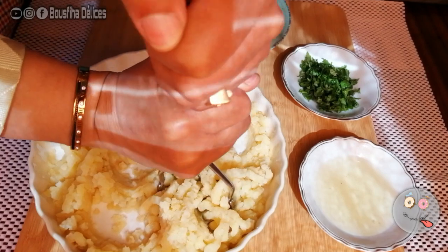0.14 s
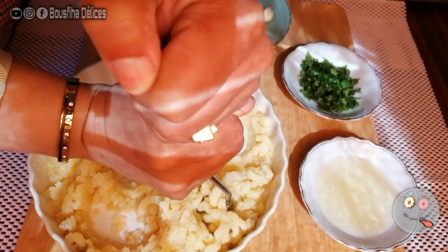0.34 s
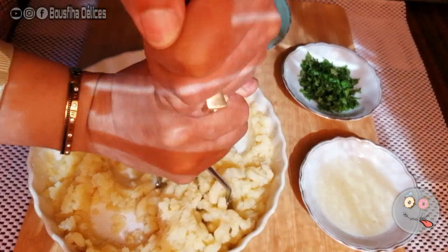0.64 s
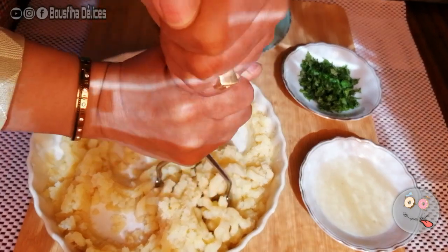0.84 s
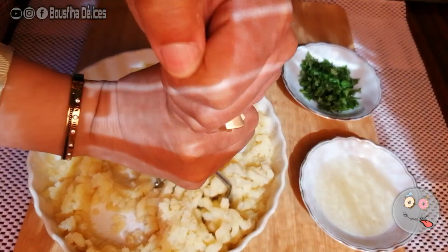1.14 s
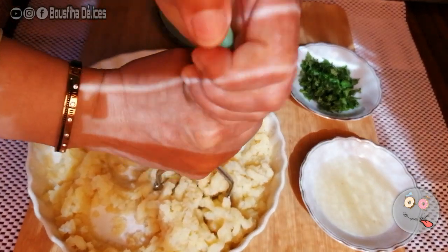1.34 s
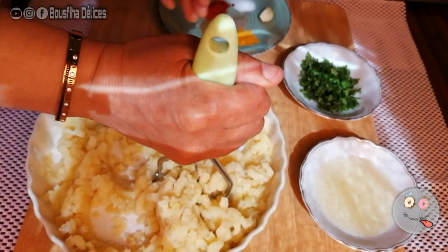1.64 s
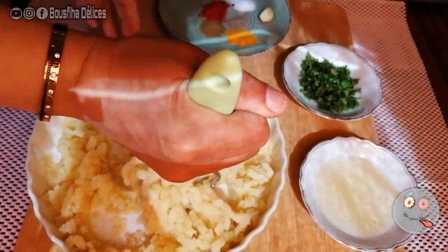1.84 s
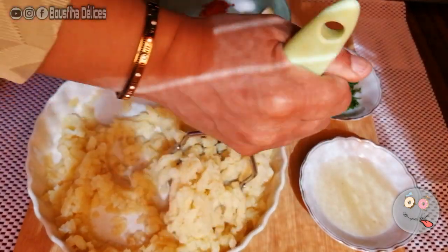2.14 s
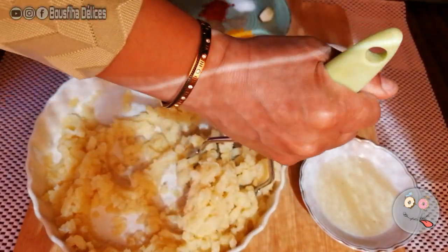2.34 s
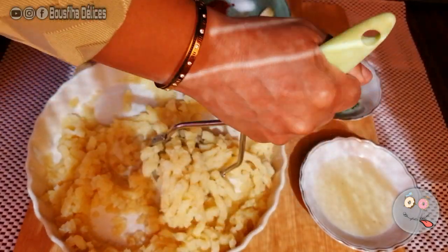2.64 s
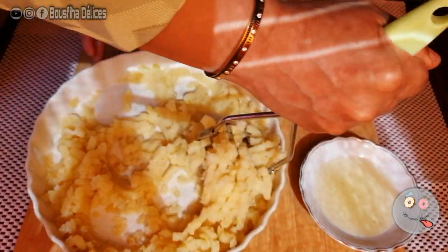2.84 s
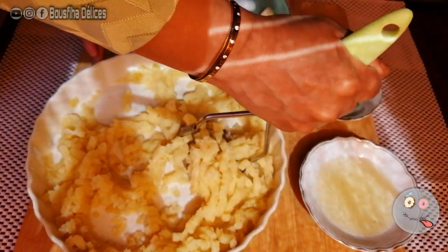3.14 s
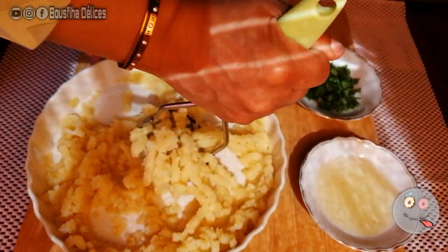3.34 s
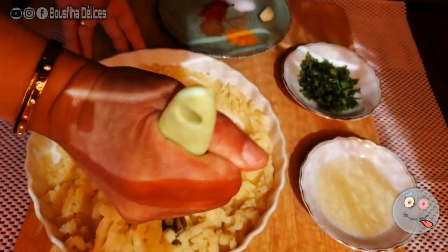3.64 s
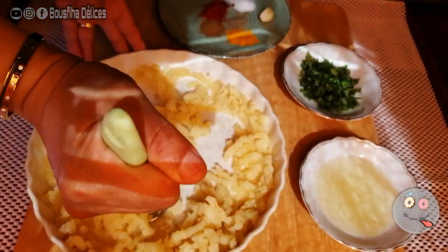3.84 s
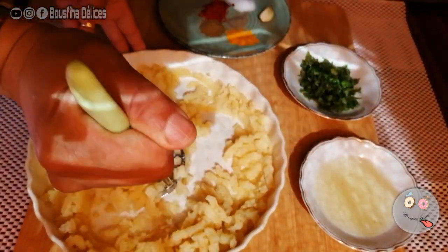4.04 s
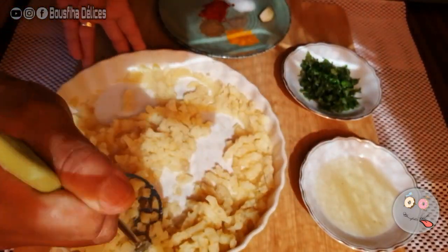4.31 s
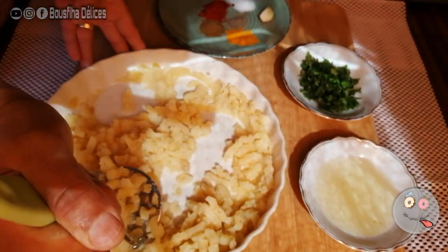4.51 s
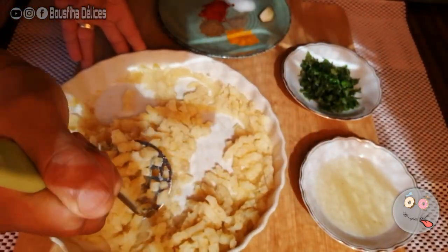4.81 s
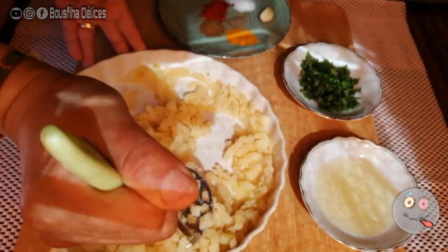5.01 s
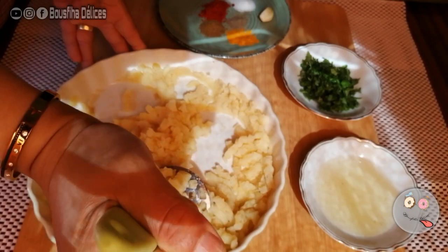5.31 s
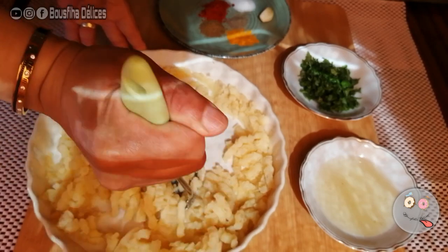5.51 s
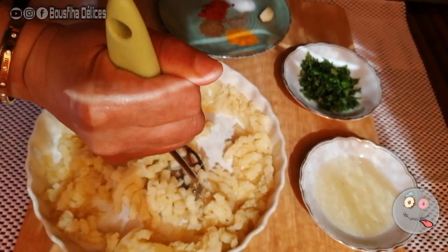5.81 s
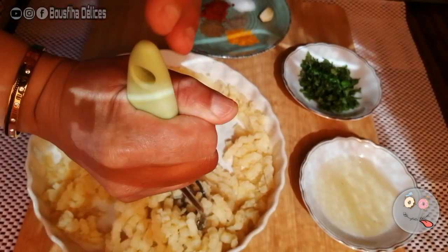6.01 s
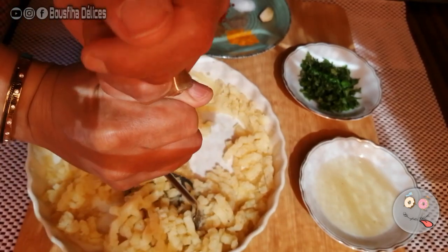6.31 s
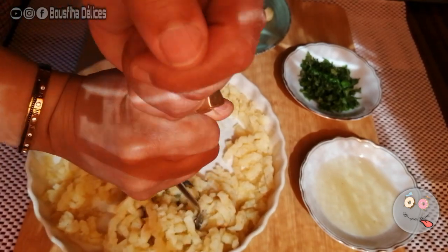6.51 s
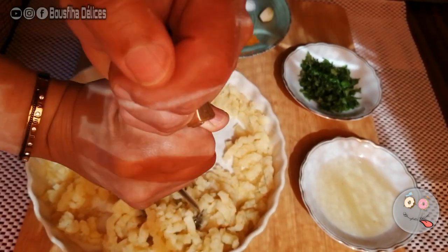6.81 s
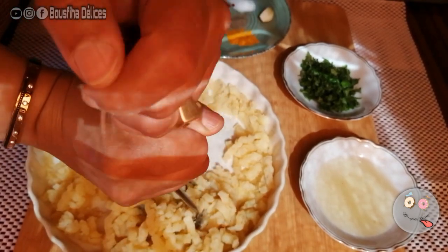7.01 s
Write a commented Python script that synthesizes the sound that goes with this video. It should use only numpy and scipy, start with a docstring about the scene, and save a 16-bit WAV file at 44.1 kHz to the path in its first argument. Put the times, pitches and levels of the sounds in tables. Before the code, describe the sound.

A close stereo microphone hears potatoes mashed in a ceramic bowl on a wooden table in a small kitchen, over very faint low rumble, wavering appliance hum and soft hiss. A full dull thud lands at 0.1 s. Fine wet crackle swells and fades as lumps give way, with small spits around 0.5 s. A light wire tap comes at 1.7 s, then a brighter, louder one at 2.3 s leading straight into a short gritty scrape that fades by about 2.6 s. Cushioned knocks follow at 2.8, 3.5, 4.3 and 5.2 s, those at 3.5 and 5.2 s a little harder. Wet pops come near 3.9 and 4.7 s, the latter with a tiny thin rim ring. A muted tap sounds at 5.7 s. Squelching thickens around 6.2 s with a very muffled thud, and a last soft knock falls at 7.0 s.

```python
"""In a small kitchen, a wire masher is pushed through boiled potatoes in a ceramic bowl on a wooden table.
Each knock is a low-passed impulse, cushioned by the mash, that excites decaying modes and a noise tail.
Between knocks the mash squelches as random grains, with noise bursts where air pockets burst.
The wire taps and grazes the bowl as struck modes, and scrapes it as grains under a stroke envelope.
Coloured noise and sines give a faint rumble, hum and hiss."""
import sys
import numpy as np
from scipy import signal
from scipy.fft import rfft, irfft, next_fast_len
from scipy.io import wavfile

SR = 44100
rng = np.random.default_rng(int(sys.argv[2]) if len(sys.argv) > 2 else 0)


def wav_out(sig):
    """Save sig, one row per channel (or a flat mono array), as 16-bit PCM at SR to the path in sys.argv[1]."""
    wavfile.write(sys.argv[1], SR, np.round(np.clip(np.atleast_2d(sig).T, -1, 1) * 32767).astype(np.int16))


N = 315756
TIME = np.arange(N) / SR
RING_TIME = TIME[:SR * 2 // 3]   # time axis of every impulse response, s


def from_db(db):
    """Logarithmic level: decibels to amplitude gain."""
    return 10 ** (np.asarray(db) / 20)


def rms_one(x):
    """Normalisation: scale to an rms of 1."""
    return x / np.sqrt(np.mean(x ** 2) + 1e-20)


def at_hz(points, hz):
    """Interpolation of a spectrum on a logarithmic frequency axis."""
    known_hz, values = np.transpose(points)
    return np.interp(np.log(np.maximum(hz, 1)), np.log(known_hz), values)


def butter(x, hz, kind, order=2):
    """Causal Butterworth filtering: a maximally flat passband."""
    sections = signal.butter(order, np.clip(hz, 10, 0.45 * SR), kind, fs=SR, output="sos")
    return signal.sosfilt(sections, x + 1e-18)


def colour(x, spectrum):
    """Spectral shaping: weight a noise by frequency, then normalise to rms 1."""
    size = next_fast_len(x.shape[-1])
    gain = from_db(at_hz(spectrum, np.fft.rfftfreq(size, 1 / SR)))
    shaped = irfft(rfft(x, size) * gain, size)
    return rms_one(shaped[..., :x.shape[-1]])


def drift(rate):
    """Slow random modulation: straight lines between random knots (rate per second), rms 1."""
    knots = rng.standard_normal(int(rate * N / SR) + 2)
    return rms_one(np.interp(TIME * rate, np.arange(len(knots)), knots))


def diffuse(size):
    """Diffuse-field coherence: two white noises, alike in the bass and unrelated in the treble."""
    # left-right likeness of the noise: f/Hz, correlation
    likeness = [(40, 0.58), (200, 0.78), (400, 0.86), (800, 0.089), (2000, 0), (6000, 0)]
    padded = next_fast_len(size)
    mid, side = rfft(rng.standard_normal((2, padded)))
    alike = np.clip(at_hz(likeness, np.fft.rfftfreq(padded, 1 / SR)), -1, 1)
    stereo = np.sqrt(1 + alike) * mid + np.sqrt(1 - alike) * side * [[1], [-1]]
    return irfft(stereo, padded)[:, :size]


def add(track, s, sound):
    """Superposition: mix a sound into a track from a given time on."""
    start = int(round(s * SR))
    track[..., start:start + sound.shape[-1]] += sound[..., :N - start]


def background():
    """Stationary noise floor: room rumble, the wavering hum of an appliance, and a faint hiss."""
    # room rumble spectrum: f/Hz, relative level/dB per Hz
    rumble_spectrum = [(18, -28), (30, -8), (42, -3.5), (62, -3), (76, -17), (107, -5), (143, -19),
                       (195, -14.5), (275, -25.5), (480, -25.5), (750, -33), (1500, -44), (3000, -74)]
    # appliance partials: f/Hz, mid-waver rms level/dB
    hum_partials = [(43, -62), (102.3, -67.5), (204.6, -73.5), (1480, -86), (2864, -100), (2912, -82),
                    (4247, -93.5)]
    # hiss spectrum: f/Hz, relative level/dB per Hz
    hiss_spectrum = [(700, 6), (1400, 1), (2300, -0.5), (3000, 2.5), (3900, -10.5), (5200, -7), (7700, -14),
                     (11500, -16.5), (15000, -14.5), (16000, -8.5)]
    rumble = from_db(-55.5) * butter(colour(diffuse(N), rumble_spectrum), 27.6, "high")
    hum = 0
    for hz, db in hum_partials:
        amplitude = np.sqrt(2) * from_db(db + 1.5 * drift(5.2))
        phase = 2 * np.pi * hz * TIME + 0.83 * drift(5.5)
        hum = hum + amplitude * np.sin(phase)
    hiss = from_db([[-67], [-64.5]]) * colour(rng.standard_normal((2, N)), hiss_spectrum)
    return rumble + hum + hiss


def grains(per_s, spread_db):
    """Shot noise: random tiny stereo clicks of uneven size and sign, rms 1."""
    unevenness = np.minimum(rng.exponential(1, (2, N)), 5)
    sizes = from_db(spread_db * unevenness) * rng.choice([-1, 1], (2, N))
    return rms_one(sizes * (rng.random((2, N)) < per_s / SR))


def squeezing():
    """Yielding: the crackle swells until a lump gives way; slow pushes also ease off slowly."""
    # pushes through a lump: moment it gives way t/s, build-up t/s, relative peak level/dB
    squeezes = [(0.02, 0.12, -69.5), (0.555, 0.11, -64), (0.87, 0.46, -70.5), (1.62, 0.24, -66),
                (1.805, 0.05, -66), (2.12, 0.2, -68), (2.37, 0.044, -61), (2.475, 0.058, -65),
                (3.1, 0.38, -69.5), (3.93, 0.035, -61.5), (4.66, 0.19, -65), (5.01, 0.09, -65),
                (5.19, 0.29, -69.5), (5.63, 0.26, -68), (6.2, 0.05, -60.5), (6.315, 0.083, -59.5),
                (7.03, 0.83, -67.5)]
    swell_db = 12.5   # rise during the build-up
    release_s, release_share = 0.026, 0.5   # it falls as far in this time plus this share of the build-up
    # worked mash keeps crackling faintly between pushes
    settle_db, settle_waver_db, settle_per_s = -78.5, 2.5, 5.5
    power = from_db(settle_db + settle_waver_db * drift(settle_per_s)) ** 2
    for s, build_s, db in squeezes:
        before = (s - TIME) / build_s
        after = (TIME - s) / (release_s + release_share * build_s)
        away = np.minimum(np.maximum(before, after), 10)
        power = power + from_db(db - swell_db * away) ** 2
    return np.sqrt(power)


def mash():
    """Fracture noise: wet starch tears in a fine crackle with lone ticks, and spits where air pockets burst."""
    # crackle spectrum: f/Hz, relative level/dB per Hz
    mash_spectrum = [(1000, 1.5), (2800, 7), (4000, 1.5), (5500, 6), (6600, 5.5), (7800, -3), (9800, 0.5),
                     (12000, -2), (15500, 1.5)]
    # bursting air pockets: t/s, level before the fade/dB, centre f/Hz
    pops = [(0.492, -51.5, 5000), (0.5468, -59, 5400), (2.963, -68, 9000), (3.921, -57, 5700),
            (4.304, -68, 10600), (4.676, -55, 8600), (5.917, -67, 5650), (6.1725, -68, 10000),
            (6.2445, -52.5, 5350)]
    crackle = grains(per_s=9000, spread_db=3.5) + from_db(-10.0) * grains(per_s=40, spread_db=5.5)
    out = from_db(1.0) * squeezing() * colour(crackle, mash_spectrum)
    moment = RING_TIME[:SR // 5]
    for s, db, centre_hz in pops:
        noise = rng.standard_normal((2, len(moment)))
        spit = rms_one(butter(noise, [centre_hz / 1.3, centre_hz * 1.07], "band", order=1))
        # a quick decay with a weaker, slower one beneath it
        fade = from_db(-60 * moment / 0.022) + from_db(-11.5 - 60 * moment / 0.28)
        onset = 1 - np.exp(-moment / 0.00022)
        add(out, s, from_db(db) * spit * fade * onset)
    return out


def ring(modes):
    """Modal synthesis: decaying stereo sines, neighbours in the list opposite in phase."""
    out = 0
    for k, (hz, db, t60, pan_db) in enumerate(modes):
        side_db = np.array([[pan_db], [-pan_db]]) / 2
        envelope = from_db(db + side_db - 60 * RING_TIME / t60)
        out = out + (-1) ** k * envelope * np.sin(2 * np.pi * hz * RING_TIME)
    return out


def flex(hz, db):
    """Damped deflection: the bowl's floor dips, springs back and settles within one and a half swings."""
    swing = np.clip(hz * RING_TIME / 1.5, 0, 1)
    return -from_db(db) * np.sin(3 * np.pi * swing) * np.sin(np.pi * swing) ** 2


def room_tail(spectrum, build_s, early_db, early_t60):
    """Reverberation: early reflections from the dishes nearby over a wash that mostly dies faster in the treble."""
    # reverberation time of the wash: f/Hz, T60/s
    room_t60 = [(80, 1), (210, 0.55), (560, 0.48), (1470, 0.36), (3880, 0.38)]
    noise = butter(colour(diffuse(len(RING_TIME)), spectrum), spectrum[0][0], "high")
    bins, hz = rfft(noise), np.fft.rfftfreq(len(RING_TIME), 1 / SR)
    centres = np.geomspace(60, 15000, 9)   # overlapping bands, Hz
    early = from_db(early_db - 60 * RING_TIME / early_t60)
    tail = 0
    for centre, share in zip(centres, np.eye(len(centres))):
        band = irfft(bins * at_hz(np.c_[centres, share], hz))
        wash = from_db(-60 * RING_TIME / at_hz(room_t60, centre))
        tail = tail + band * (wash + early)
    return tail * (1 - np.exp(-RING_TIME / build_s))


def knocks():
    """Cushioned impact: mash softens each blow; a little treble passes where the wire reaches the glaze."""
    # masher bottoms out: t/s, relative level/dB, cushion cut-off f/Hz, treble let through level/dB
    blows = [(0.0727, 1.5, 614, -17), (2.8053, -4.5, 1380, -17), (3.5185, -2.5, 2180, -12),
             (4.2828, -5.5, 1280, -16.5), (5.2402, 0.5, 2500, -10.5), (6.254, -4, 160, -21.5),
             (7.0354, -2.5, 473, -21)]
    # modes of bowl, table top and room together: f/Hz, level for a 0 dB blow/dB, T60/s, left-right level/dB
    table_modes = [(60.6, -45, 0.29, 4), (102.96, -29.5, 0.65, 3), (123.8, -38, 0.52, -4),
                   (174, -29, 0.1, -3), (175.2, -31.5, 0.34, -2), (198.7, -39, 0.4, 4),
                   (217.8, -42.5, 0.42, 12.5), (213.4, -27.5, 0.074, 3.5), (244, -36, 0.34, -2),
                   (283, -50, 0.36, 3), (349.3, -32.5, 0.29, -1), (364, -20, 0.039, -2.5),
                   (401.5, -39.5, 0.27, 16), (445, -52, 0.21, -7), (468, -40, 0.39, -2),
                   (466, -38.5, 0.1, 12), (532.7, -45, 0.25, 8), (665, -45, 0.25, -16.5),
                   (719, -31, 0.029, 5), (1000, -44, 0.26, 2), (1100, -32, 0.035, 4),
                   (1523, -35, 0.037, -12), (1542, -42, 0.14, -5), (1844, -31.5, 0.018, 3),
                   (2750, -33, 0.0075, 14), (3230, -39, 0.018, -4), (5780, -41, 0.0085, -1)]
    # room answer to a knock: f/Hz, relative level/dB per Hz
    knock_tail = [(420, 2.5), (600, -6.5), (800, -2.5), (1100, -5), (1600, -9.5), (2300, -13.5),
                  (3200, -16.5), (4000, -24.5), (6500, -28), (9000, -67)]
    out, impulse = np.zeros((2, N)), signal.unit_impulse(SR // 10)
    body = flex(hz=381, db=-22.0) + ring(table_modes)
    for s, db, cushion_hz, through_db in blows:
        thud = butter(impulse, cushion_hz, "low")
        blow = thud - from_db(through_db) * butter(impulse, cushion_hz, "high")
        # each blow lands on another spot, so its reflections differ
        room = from_db(-31) * room_tail(knock_tail, build_s=0.0019, early_db=8, early_t60=0.022)
        add(out, s, from_db(db) * signal.fftconvolve(blow[None], body + room, axes=-1))
    return out


def excite(force, response):
    """Linear convolution: play a force through a stereo impulse response."""
    return signal.fftconvolve(force[None], response, axes=-1)[:, :N]


def taps():
    """Hard impact: bare wire meets the bowl wall in a short contact, then a hollow bloom comes from the room."""
    # wire taps the side of the bowl: t/s, relative level/dB, contact cut-off f/Hz
    contacts = [(1.6753, -9, 4940), (2.2775, 0, 10900), (5.7288, -6.5, 2300)]
    # modes of bowl wall and steel wire: f/Hz, level for a 0 dB tap/dB, T60/s, left-right level/dB
    wall_modes = [(102.4, -42.5, 0.48, 2), (198, -35.5, 0.1, 2.5), (349, -44.5, 0.25, -8),
                  (406, -43.5, 0.095, -3), (472, -50, 0.45, 11), (575, -61, 0.26, 0), (595, -59, 0.23, 1),
                  (673, -49, .1, 2), (1107, -40, 0.029, 1), (1370, -65, .2, -2), (1970, -39.5, .015, -6),
                  (2420, -36.5, 0.022, 5), (3310, -39, 0.0074, -9), (4800, -43.5, 0.026, -5),
                  (6450, -46, 0.013, -5), (9840, -43, 0.0046, 4)]
    # room answer to a tap: f/Hz, relative level/dB per Hz
    tap_tail = [(330, -3), (600, 6), (850, -8), (1600, 1), (2600, -4.5), (4000, -13.5), (6300, -15.5),
                (7800, -34), (10000, -28), (14000, -38)]
    # low bloom that swells after a tap: f/Hz, relative level/dB per Hz
    tap_bloom = [(300, 2.5), (480, 1.5), (650, -2.5), (800, -38), (2000, -40)]
    force = np.zeros(N)
    for s, db, contact_hz in contacts:
        add(force, s, from_db(db) * butter(signal.unit_impulse(SR // 10), contact_hz, "low"))
    room = from_db(-45.0) * room_tail(tap_tail, build_s=0.00037, early_db=12.5, early_t60=0.012)
    bloom = from_db(-41) * room_tail(tap_bloom, build_s=0.019, early_db=-8, early_t60=0.06)
    return excite(force, ring(wall_modes) + room + bloom)


def slide(start_s, attack_s, hold_s, t60_s):
    """Stroke envelope: a straight rise, a hold, then an exponential decay."""
    age = TIME - start_s
    decay = from_db(-60 * np.maximum(age - attack_s - hold_s, 0) / t60_s)
    return np.clip(age / attack_s, 0, 1) * decay


def drag():
    """Stick-slip friction: the wire slips over the glaze in small catches, gripping unevenly."""
    # scrape spectrum: f/Hz, relative level/dB per Hz
    drag_spectrum = [(200, 3), (500, -18), (900, -3.5), (1400, 2), (2500, 3), (4000, -1.5), (5500, -9.5),
                     (6800, -11), (7600, -24), (10000, -21), (15000, -41)]
    grip = from_db(2.2 * drift(220))
    # the wire bites, slides and lets go
    stroke = from_db(-48.5) * slide(start_s=2.308, attack_s=0.046, hold_s=0.045, t60_s=0.22)
    catches = grains(per_s=2500, spread_db=3)
    fine_catches = from_db(3) * grains(per_s=13000, spread_db=3.0)
    return stroke * grip * colour(catches + fine_catches, drag_spectrum)


def grazes():
    """Free vibration: the lifted wire touches the rim lightly and lets it ring."""
    # touches on the rim: t/s, relative level/dB
    touches = [(4.7052, -59.5)]
    # free modes of the rim: f/Hz, relative level/dB, T60/s, left-right level/dB
    rim_modes = [(1536, -7, 0.4, 15), (2412, 0, 0.17, -10), (3320, -12, 0.61, 2), (4237, -21, .25, -1),
                 (5020, -14, 0.16, -3), (6200, -8, 0.12, -2), (8800, -17, 0.16, 0)]
    out = np.zeros((2, N))
    for s, db in touches:
        add(out, s, from_db(db) * ring(rim_modes))
    return out


def scene():
    """Superposition of everything at the table."""
    return background() + mash() + knocks() + taps() + drag() + grazes()


def port(x, resonances):
    """Port resonance: each peak filter raises or lowers the level around its centre."""
    for hz, width_hz, gain_db in resonances:
        peak = signal.lfilter(*signal.iirpeak(hz, hz / width_hz, fs=SR), x)
        x = x + (from_db(gain_db) - 1) * peak
    return x


def record(dry):
    """Transducer response: two unlike microphone ports, then a steep elliptic low-pass."""
    # resonances of the left microphone port: centre f/Hz, width f/Hz, gain level/dB
    left_port = [(4830, 270, -8), (9410, 1480, 11.5), (14900, 700, -5)]
    # resonances of the right microphone port: centre f/Hz, width f/Hz, gain level/dB
    right_port = [(5160, 950, 6.1), (6150, 950, 8.94), (14950, 240, 2.3)]
    cutoff_hz = 15800
    heard = np.array([port(dry[0], left_port), port(dry[1], right_port)])
    return signal.sosfilt(signal.ellip(10, 0.1, 80, cutoff_hz, fs=SR, output="sos"), heard)


dry = scene()
out = record(dry)
wav_out(out)
```